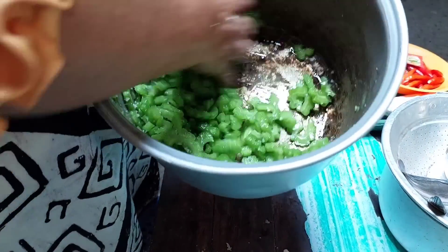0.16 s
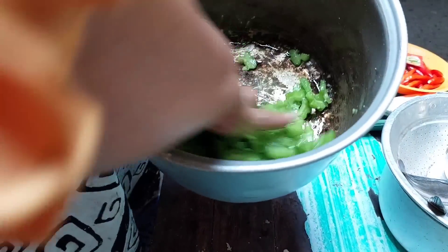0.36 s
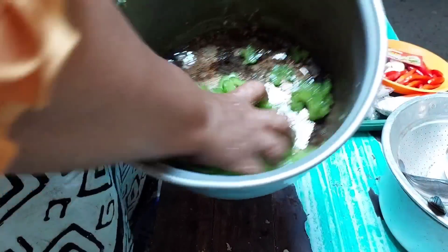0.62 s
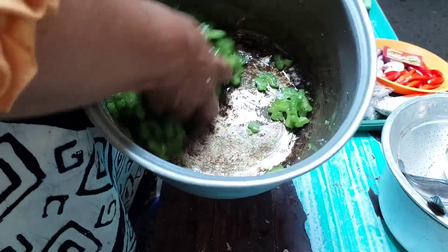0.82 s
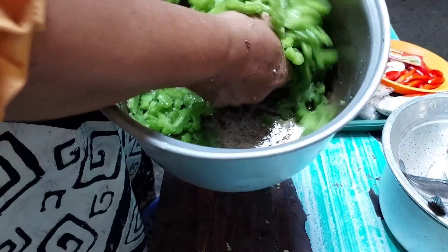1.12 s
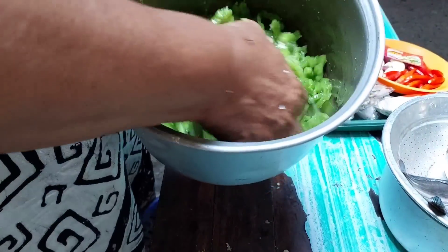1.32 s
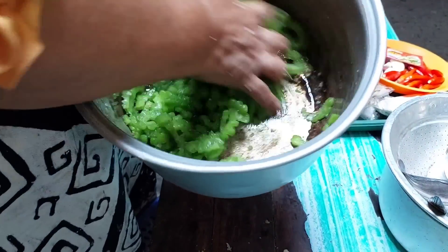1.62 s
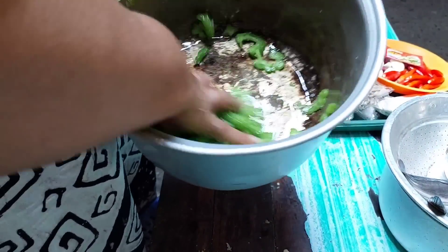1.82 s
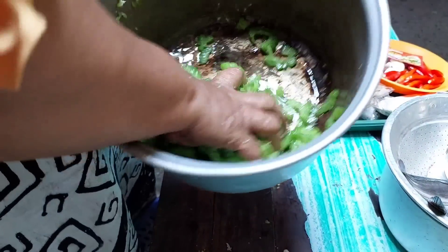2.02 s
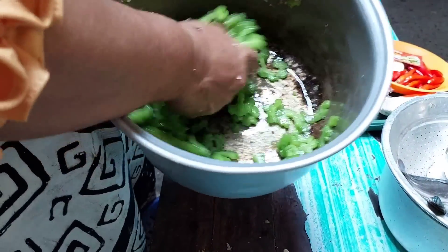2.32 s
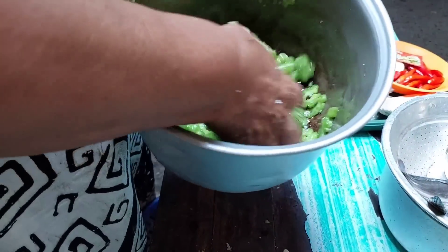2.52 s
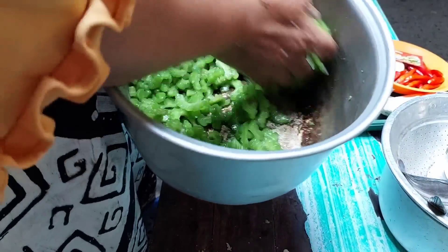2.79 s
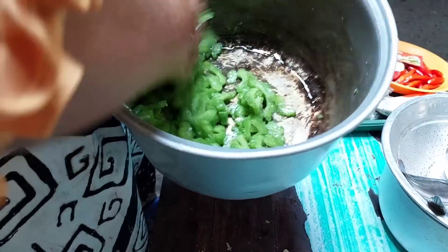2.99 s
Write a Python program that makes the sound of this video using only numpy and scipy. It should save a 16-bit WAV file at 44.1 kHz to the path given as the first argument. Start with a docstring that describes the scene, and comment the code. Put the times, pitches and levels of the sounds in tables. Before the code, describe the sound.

A hand kneads wet sliced vegetables in a metal pot, with swishes and soft thuds.

```python
"""Wet vegetable slices in an aluminium pot

A hand sweeps salted slices round the pot, lifts them and lets them drop. Friction of salt, juice and
slices on the metal makes a bright hiss. Slices and knuckles strike the pot and excite its modes, the
lowest booming near 400 Hz. Wet snaps spit in the treble and pockets of juice pop, over a low rumble
that leans to the left."""
import sys
import numpy as np
from scipy import signal
from scipy.fft import rfft, irfft
from scipy.io import wavfile

SR = 44100
rng = np.random.default_rng(int(sys.argv[2]) if len(sys.argv) > 2 else 0)


def waveform_to_disk(signal):
    """Save audio, clipped to [-1, 1], as 16-bit WAV at the path in sys.argv[1]."""
    frames = np.transpose(np.atleast_2d(signal))
    scaled = np.clip(frames, -1, 1) * 32767
    samples = np.round(scaled).astype(np.int16)
    wavfile.write(sys.argv[1], SR, samples)


N = 138915


def sweep():
    """Friction noise: salt, juice and slices drag over the metal in dense micro-impacts and tiny pops."""
    # course of the hand: (time [s], hiss [dB], sizzle [dB], scrape [dB], patter [dB])
    strokes = [(0, -45, -50, -49, -31.5), (0.05, -41, -54, -48, -60), (0.095, -45, -53, -48, -32.5),
               (0.185, -40, -39, -44.5, -29.5), (0.225, -28.5, -39, -40, -29), (0.24, -32, -29, -39.5, -37),
               (0.262, -20, -29, -27, -23), (0.29, -21, -21, -29, -27), (0.32, -19.5, -21.5, -30.5, -29.5),
               (0.36, -23.5, -27.5, -31, -32.5), (0.47, -20, -28, -30, -30.5), (0.54, -25, -34, -31.5, -36),
               (0.565, -36, -41, -37, -30), (0.585, -28, -27, -39.5, -32), (0.62, -30, -37, -32, -27),
               (0.645, -42.5, -46, -42, -33), (0.7, -35.5, -45, -41.5, -37), (0.8, -30.5, -34, -36, -33),
               (0.85, -25.5, -28.5, -34.5, -33), (0.9, -27.5, -32, -33.5, -33),
               (0.93, -25.5, -22.5, -33, -27), (1.03, -26.5, -28.5, -30.5, -31),
               (1.08, -28, -34, -37.5, -33), (1.11, -33.5, -40, -38.5, -32.5),
               (1.2, -34.5, -41, -43, -39.5), (1.44, -38.5, -41, -43, -27.5), (1.51, -45, -50, -44.5, -41),
               (1.56, -35.5, -44, -49, -37), (1.63, -41.5, -45, -44, -42.5), (1.71, -35.5, -36, -43, -37.5),
               (1.73, -26, -25, -32.5, -40), (1.79, -22.5, -25.5, -32.5, -35),
               (1.9, -30.5, -34, -33.5, -32), (1.96, -27, -32.5, -32.5, -30),
               (2.035, -37.5, -40, -40.5, -36), (2.1, -35.5, -42, -35, -28), (2.14, -31.5, -36, -32, -36),
               (2.19, -38.5, -46, -39.5, -34), (2.26, -34, -40.5, -34.5, -25.5),
               (2.4, -39, -42, -36, -23.5), (2.49, -50.5, -56, -47, -46), (2.6, -47, -47, -54, -33.5),
               (2.69, -50, -64, -51, -40.5), (2.75, -35, -43, -47, -31), (2.8, -43, -48, -49.5, -41.5),
               (2.85, -31, -32, -40, -35), (2.95, -28, -27, -36.5, -37.5), (3.05, -27, -28, -34, -45),
               (3.15, -29.5, -32, -39, -35)]
    # spectra of the bright, topmost and duller friction bands: (frequency [Hz], relative level [dB])
    hiss_spectrum = [(4500, -23), (5300, -9.5), (6500, -2.5), (8300, 0), (10000, -4), (11200, -21.5),
                     (12500, -26)]
    sizzle_spectrum = [(9000, -27), (10200, 0), (11500, 2.5), (13500, 2), (15100, -3.5), (16000, -6)]
    scrape_spectrum = [(700, 5.5), (1200, 1), (2200, 0), (2750, 3), (3200, 0.5), (5000, 2), (6500, -14.5)]
    hiss_db, sizzle_db, scrape_db, patter_db = in_time(strokes)
    flicker_db = 1.4 * drift(rate_hz=50)
    salt, slices = (grains(per_s=8300, spread_db=0.5) for _ in range(2))
    hiss = unit(colour(salt, hiss_spectrum) + amp(-9.5) * pops(6200, 11000, cycles=610))
    sizzle = colour(salt, sizzle_spectrum)
    scrape = unit(colour(slices, scrape_spectrum) + amp(-6) * pops(1247.3, 4788, cycles=204))
    out = amp(flicker_db) * (amp(hiss_db) * hiss + amp(sizzle_db) * sizzle)
    out += amp(scrape_db + 1.07 * flicker_db) * scrape
    return out + amp(patter_db) * patter()


def pops(low_hz, high_hz, cycles):
    """Constant-Q resonance: each tiny pop rings at one of 16 pitches, falling 60 dB in `cycles` periods."""
    clicks = grains(per_s=330, spread_db=3.9)
    choice = rng.integers(0, 16, N)
    pitches = np.geomspace(low_hz, high_hz, 16)
    return unit(sum(ring(clicks * (choice == k), hz, cycles / hz) for k, hz in enumerate(pitches)))


def patter():
    """Random excitation of modes: loose slices tap the pot, each tap driving the modes unequally."""
    # modes of the pot: (frequency [Hz], relative gain [dB], T60 [s])
    pot_modes = [(400, -0.5, 0.13), (521, 6, 0.03), (669.4, -15.5, 0.17), (906, -0.5, 0.026),
                 (1016, -9.5, 0.089)]
    taps = grains(per_s=270, spread_db=3.5)
    out = np.zeros(N)
    for hz, db, t60 in pot_modes:
        force = taps * rng.uniform(0.078, 1, N) + 0.033 * rng.standard_normal(N)
        out += amp(db) * ring(force, hz, t60)
    return unit(bandpass(out, 310, 1250, order=3))


def thuds():
    """Modal response: a soft blow drives three modes of the pot while it pushes; then they decay freely."""
    # Where the slices lie and the hand rests shifts the two lowest modes from blow to blow.
    # blows: (time [s], boom level [dB], push [s], boom T60 [s], boom frequency [Hz],
    # second mode [Hz], second mode level [dB re boom], third mode drive [dB re boom])
    blows = [(0.074, -29, 0.0036, 0.035, 395, 850, 0.5, -10),
             (0.099, -24, 0.006, 0.058, 400, 560, -17, -12),
             (0.116, -17, 0.0032, 0.058, 414, 550, -0.5, -20), (0.15, -17, 0.0032, 0.054, 400, 565, 5, -16),
             (0.193, -9.5, 0.0052, 0.066, 421, 710, 0.5, -16.5),
             (0.262, -23, 0.022, 0.1, 393.6, 573, 0.5, -19), (0.284, -29, 0.0082, 0.061, 400, 560, 5, 0),
             (0.324, -18.5, 0.0074, 0.066, 410, 553, -10, -21),
             (0.428, -20.5, 0.0054, 0.065, 400, 525, -23, -18),
             (0.449, -17, 0.0075, 0.049, 406, 535, -17, -18), (0.48, -15, 0.0047, 0.06, 393, 525, -21, -30),
             (0.5443, -10.5, 0.0082, 0.13, 406, 560, -2.5, -27),
             (0.57, -12, 0.011, 0.093, 390.4, 560, -7, -45), (0.592, -6, 0.013, 0.042, 400, 648, 1, -21.5),
             (0.613, -18.5, 0.0062, 0.061, 410, 554, 1, -31),
             (0.669, -28, 0.0059, 0.042, 386, 600, 10.5, -11),
             (0.703, -30, 0.0096, 0.039, 385, 585, 9, -14), (0.832, -26.5, 0.015, 0.08, 404, 550, 2, -15),
             (0.862, -10, 0.008, 0.068, 396, 630, -15, -40), (0.942, -22, 0.0058, 0.12, 420, 530, -22, -10),
             (1.078, -22.5, 0.0044, 0.067, 401, 520, -24, -14),
             (1.177, -18, 0.0076, 0.043, 410, 537, -26, -36),
             (1.316, -16.5, 0.0099, 0.088, 382, 600, 0.5, -29),
             (1.332, -10.5, 0.013, 0.044, 395.5, 530, -19, -45),
             (1.364, -13.5, 0.012, 0.05, 379, 590, 0, -16.5),
             (1.393, -7.5, 0.013, 0.031, 386, 593, -6.5, -31),
             (1.427, -16.5, 0.009, 0.023, 375, 570, -12, -21),
             (1.456, -16.5, 0.015, 0.03, 398, 590, -4, -31),
             (1.47, -15, 0.0045, 0.046, 497, 830, 2.5, -12.5),
             (1.496, -16, 0.0036, 0.089, 367.3, 806, -4, -13),
             (1.511, -13, 0.0041, 0.07, 391, 530, -38, -25),
             (1.729, -32.5, 0.0045, 0.036, 393, 557, 10.5, 4),
             (1.745, -35.5, 0.0061, 0.028, 395, 595, 9, 12.5),
             (1.856, -28, 0.0072, 0.027, 415, 540, 4, -23), (1.903, -16.5, 0.008, 0.036, 420, 550, -8, -35),
             (1.954, -22.5, 0.01, 0.026, 433, 710, -10, -15), (2.028, -24, 0.0063, 0.055, 370, 650, 1, -19),
             (2.073, -21, 0.0073, 0.11, 413, 544, -10, -24), (2.127, -23.5, 0.0096, 0.06, 388, 640, 7, -6),
             (2.148, -10.5, 0.0041, 0.046, 412, 657, -5, -18),
             (2.241, -21, 0.0054, 0.035, 416, 540, -32, -18),
             (2.273, -17.5, 0.0061, 0.028, 432, 553, -8, -22),
             (2.299, -20, 0.0054, 0.034, 418, 544, -6, -25),
             (2.342, -14.5, 0.01, 0.094, 410, 543, -22, -12.5),
             (2.359, -17, 0.012, 0.06, 420, 540, -23, -21), (2.389, -14, 0.01, 0.046, 402, 535, -1.5, -21),
             (2.446, -22, 0.0063, 0.056, 404, 536, -5, -16),
             (2.547, -22.5, 0.01, 0.029, 398, 640, -18, -22),
             (2.596, -13.5, 0.0097, 0.041, 453, 540, -11, -46),
             (2.611, -15.5, 0.0098, 0.028, 398, 550, -8, -43),
             (2.636, -27, 0.0098, 0.044, 431, 600, -18, -30),
             (2.652, -6, 0.011, 0.056, 405, 645, -5.5, -21.5),
             (2.719, -16, 0.0065, 0.06, 406, 560, -17, -27), (2.737, -16, 0.0091, 0.056, 407, 516, -7, -31),
             (2.761, -12.5, 0.0069, 0.074, 392, 565, -8.5, -33),
             (2.932, -23.5, 0.0046, 0.044, 405, 617, -4, -7)]
    # third mode of the pot: (mean frequency [Hz], gain [dB], T60 [s])
    third_mode = (1025, 5.8, 0.06)
    third_hz, third_gain_db, third_t60 = third_mode
    second_t60, rise_share = 0.02, 0.17
    out = np.zeros(N)
    for start, db, push, boom_t60, boom_hz, second_hz, second_db, third_db in blows:
        detune = 1 + 0.02 * rng.standard_normal()
        modes = [(boom_hz, 0, boom_t60),
                 (second_hz, second_db, second_t60),
                 (third_hz * detune, third_gain_db + third_db, third_t60)]
        for hz, mode_db, t60 in modes:
            hold = push * min(1, boom_hz / hz) ** 2  # higher modes are driven more briefly
            rise = max(rise_share * hold, 0.5 / hz)
            add(out, start, amp(db + mode_db) * tone(hz, rise, t60, hold))
    return out


def bumps():
    """Whole-body vibration: heavier nudges shake the entire pot in a low, quickly damped tone."""
    # nudges: (time [s], peak level [dB], frequency [Hz])
    nudges = [(0.075, -26.5, 211), (0.191, -28, 183), (0.831, -28, 196), (1.47, -14, 171),
              (1.495, -22, 150), (1.516, -26, 243), (2.718, -32, 110), (2.756, -19.5, 179)]
    out = np.zeros(N)
    for start, db, hz in nudges:
        add(out, start, amp(db) * tone(hz, rise=0.0019, t60=0.032))
    return out


def snaps():
    """Broadband transients: each wet snap is a crack, then a fizz of noise with a resonant peak."""
    # wet snaps: (time [s], relative level [dB], centre [Hz], fizz T60 [s], relative dull level [dB])
    bursts = [(0.1134, -13.5, 6660, 0.053, -21.5), (0.143, -24, 8780, 0.04, -38),
              (0.151, -18, 7660, 0.038, -35), (0.167, -19, 9890, 0.048, -44),
              (0.1728, -18, 9700, 0.018, -21.5), (0.206, -6.5, 10000, 0.06, -24),
              (0.591, -13, 8000, 0.035, -20), (0.5946, -6, 7460, 0.018, -15),
              (0.6589, -20, 7050, 0.034, -36), (1.177, -13, 10000, 0.069, -18.5),
              (1.271, -18, 8600, 0.04, -26), (1.363, -9, 6700, 0.044, -30),
              (1.3833, -18, 10400, 0.028, -39), (1.4144, -1.5, 7300, 0.028, -27),
              (1.4626, -10, 9500, 0.029, -33), (1.477, -18, 12000, 0.025, -30),
              (1.488, -14, 7500, 0.053, -21), (1.516, -27, 8000, 0.03, -26), (1.5265, -3, 7550, 0.04, -36),
              (1.5302, -10, 7600, 0.041, -39), (1.721, -15, 10000, 0.053, -34),
              (2.4165, -14.5, 7500, 0.046, -22), (2.508, -26.5, 8300, 0.027, -40),
              (2.5468, -27, 9400, 0.036, -42), (2.558, -19, 8500, 0.03, -29),
              (2.6333, -21, 10100, 0.035, -22), (2.6543, -18, 10700, 0.042, -22),
              (2.661, -12, 9500, 0.056, -21.5), (2.7187, -20, 9090, 0.054, -35),
              (2.811, -14.5, 7040, 0.02, -29)]
    rise_s, length = 0.00018, SR // 4
    crack = amp(-3) * envelope(rise_s, t60=0.004)
    out = np.zeros(N)
    for start, db, hz, t60, dull_db in bursts:
        sputter_db = 2 * np.repeat(rng.standard_normal(length // 40 + 1), 40)  # steps of about 1 ms
        white = rng.standard_normal(length) * amp(sputter_db[:length])
        bright = bandpass(white, 6200, 14500, order=3)
        dull = bandpass(white, 1200, 5000, order=2)
        peak = signal.lfilter(*signal.iirpeak(hz, Q=14, fs=SR), bright)
        noise = unit(unit(peak) + 0.96 * unit(bright)) + amp(dull_db + 13.5) * unit(dull)
        add(out, start, amp(db - 12) * (crack + envelope(rise_s, t60)) * noise)
    return out


def pips():
    """Damped oscillation: a pocket of juice pops and rings as a short wet tone; a hard blow also sets off a
    brief metallic clank."""
    # short tones: (time [s], peak level [dB], frequency [Hz]); the row at 0.593 s is the metallic clank of the
    # hard blow there, the others are pockets of juice popping
    pings = [(0.283, -26, 2710), (0.593, -19.5, 2200), (1.931, -31.5, 3750), (1.933, -33, 2750),
             (2.124, -29, 2550)]
    out = np.zeros(N)
    for start, db, hz in pings:
        add(out, start, amp(db) * tone(hz, rise=0.0016, t60=0.081))
    return out


def rumble():
    """Interchannel level difference: low, lumpy noise whose deepest part is stronger on the left."""
    # course of the rumble: (time [s], level [dB])
    swells = [(0, -40.5), (.12, -42), (.3, -35), (1.3, -41), (1.5, -35), (1.57, -42.5), (1.68, -48.5),
              (1.74, -37.5), (2.3, -39), (2.5, -43.5), (2.75, -40), (3.15, -38)]
    # spectrum of the rumble: (frequency [Hz], relative level [dB])
    spectrum = [(20, -15), (60, 2), (80, -1), (128, -7), (173, -2), (263, -6.5), (320, -12.5), (420, 5.5),
                (700, -120)]
    level_db, = in_time(swells)
    mid, uncorrelated = (colour(rng.standard_normal(N), spectrum) for _ in range(2))
    hz = np.arange(N // 2 + 1) * SR / N
    side = amp(-13) * mid + amp(-26) * uncorrelated
    side = irfft(rfft(side) / (1 + (hz / 150) ** 4), N)  # the lean fades above 150 Hz
    return amp(level_db + 0.99 * drift(rate_hz=3)) * np.array([mid + side, mid - side])


def amp(db):
    """Amplitude ratio of a level in decibels."""
    return 10 ** (np.asarray(db) / 20)


def unit(x):
    """Normalisation to an rms of 1."""
    return x / np.sqrt(np.mean(x ** 2) + 1e-20)


def in_time(rows):
    """Linear interpolation of each level column at every sample."""
    times, *columns = np.transpose(rows)
    return [np.interp(np.arange(N) / SR, times, column) for column in columns]


def colour(x, spectrum):
    """Spectral shaping, with a gain of -60 dB outside the given points; rms 1."""
    hz, db = np.transpose(spectrum)
    log_hz = np.log(np.arange(N // 2 + 1) * SR / N + 1)
    gain_db = np.interp(log_hz, np.log(hz), db, left=-60, right=-60)
    return unit(irfft(rfft(x) * amp(gain_db), N))


def bandpass(x, low_hz, high_hz, order):
    """Band limiting with a maximally flat passband."""
    return signal.sosfilt(signal.butter(order, [low_hz, high_hz], "band", fs=SR, output="sos"), x)


def drift(rate_hz):
    """Slow random fluctuation: low-passed noise of rms 1."""
    r = np.exp(-2 * np.pi * rate_hz / SR)
    return unit(signal.lfilter([1], [1, -2 * r, r * r], rng.standard_normal(N + SR))[SR:])


def grains(per_s, spread_db):
    """Shot noise: independent clicks of uneven size and sign."""
    size = amp(spread_db * np.minimum(rng.exponential(1, N), 4)) * rng.choice([-1, 1], N)
    return size * (rng.random(N) < per_s / SR)


def ring(clicks, hz, t60):
    """Two-pole resonator: each click starts a decaying sine."""
    r, w = amp(-60 / (t60 * SR)), 2 * np.pi * hz / SR
    return signal.lfilter([0, np.sin(w)], [1, -2 * r * np.cos(w), r * r], clicks + 1e-18)


def envelope(rise, t60, hold=0):
    """Smooth onset and exponential decay after a hold (all in s); a quarter second long, peak 1."""
    t = np.arange(SR // 4) / SR
    onset = (1 - np.exp(-t / rise)) ** 2
    curve = onset * amp(-60 * np.maximum(t - hold, 0) / t60)
    return curve / curve.max()


def tone(hz, rise, t60, hold=0):
    """A single damped mode: a sine that swells and dies away."""
    t = np.arange(SR // 4) / SR
    return envelope(rise, t60, hold) * np.sin(2 * np.pi * hz * t)


def add(out, start, piece):
    """Superposition of a sound from `start` seconds on."""
    i = int(start * SR)
    out[i:i + len(piece)] += piece[:len(out) - i]


def scene():
    """Sources add linearly: the pot in the centre, over the rumble and a faint microphone hiss."""
    pot = thuds() + bumps() + snaps() + pips() + sweep()
    return pot + rumble() + amp(-60) * rng.standard_normal(N)


def record(dry):
    """Limited bandwidth and range: the microphone drops the deepest bass, clips and cuts the top."""
    bass_cut = signal.butter(3, 38, "high", fs=SR, output="sos")
    treble_cut = signal.cheby2(16, 60, 16050, fs=SR, output="sos")
    clipped = np.clip(signal.sosfilt(bass_cut, dry), -1, 1)
    return signal.sosfilt(treble_cut, clipped)


dry = scene()
out = record(dry)
waveform_to_disk(out)
```